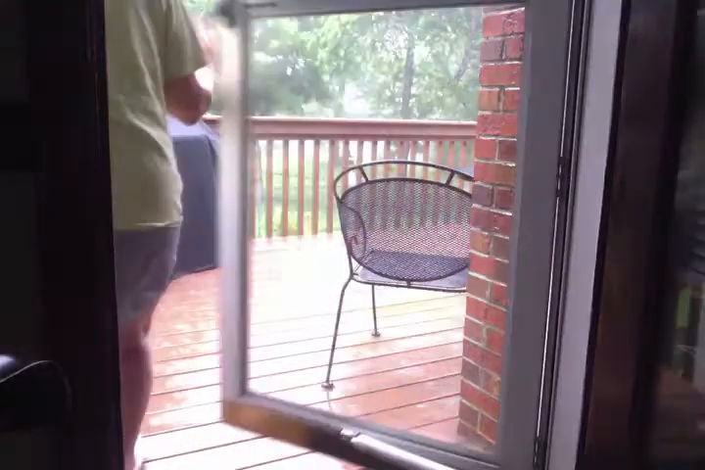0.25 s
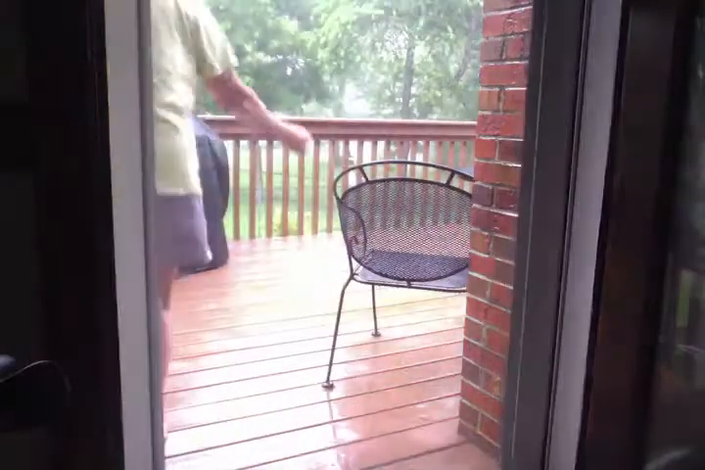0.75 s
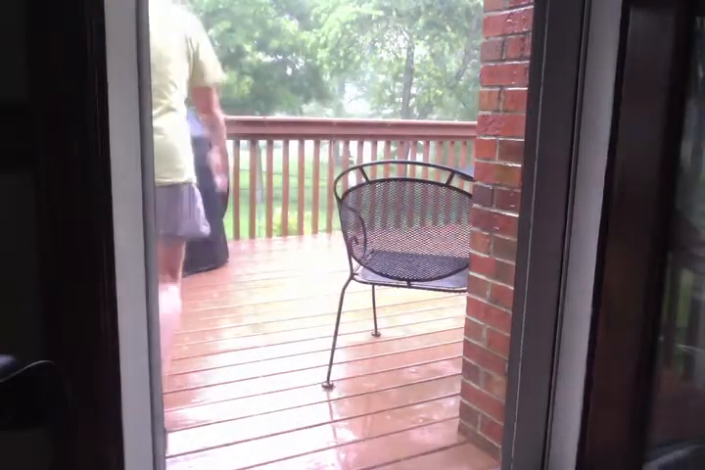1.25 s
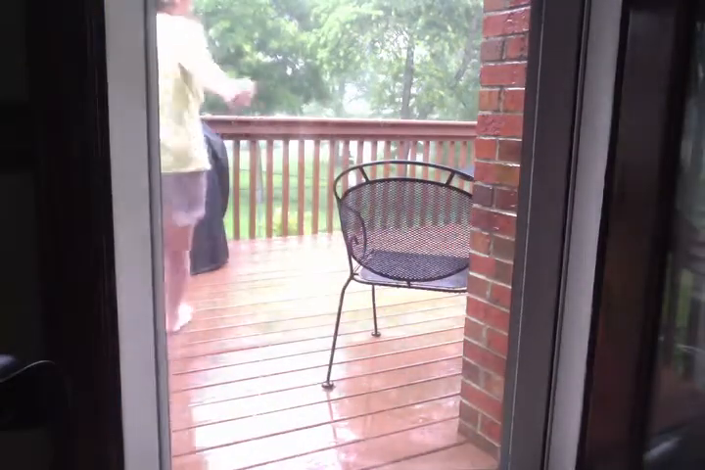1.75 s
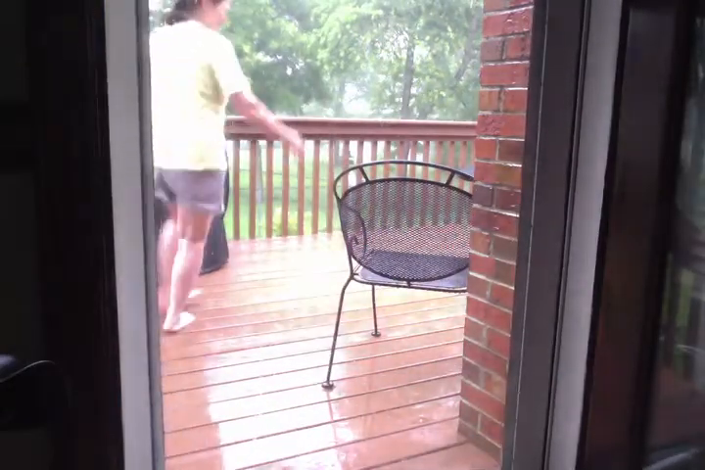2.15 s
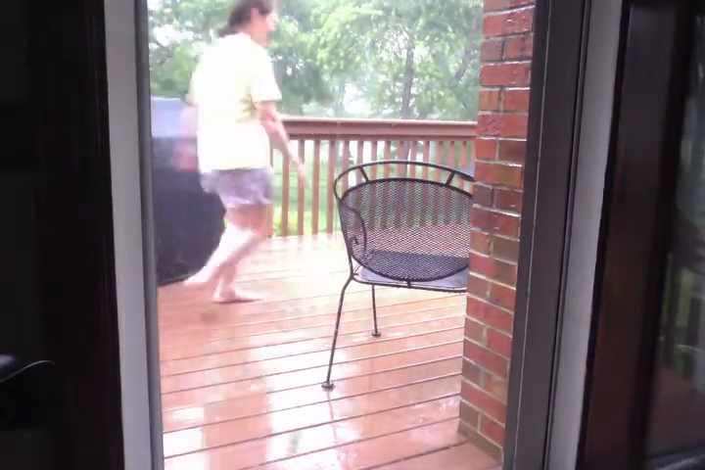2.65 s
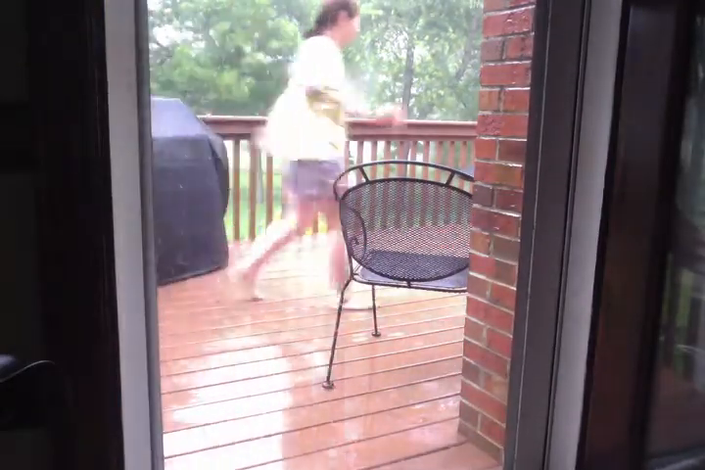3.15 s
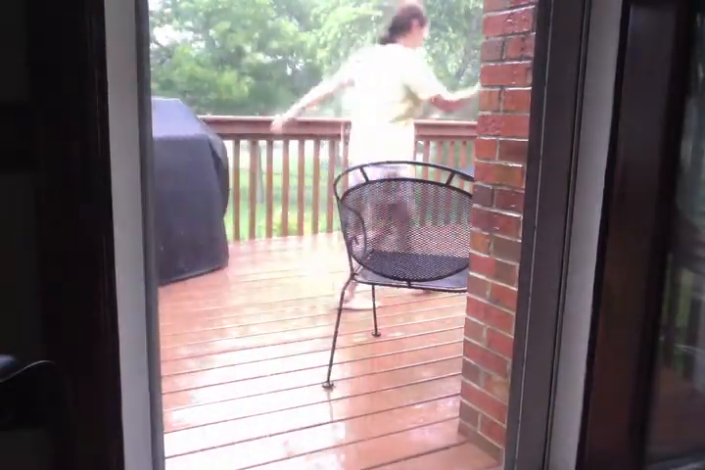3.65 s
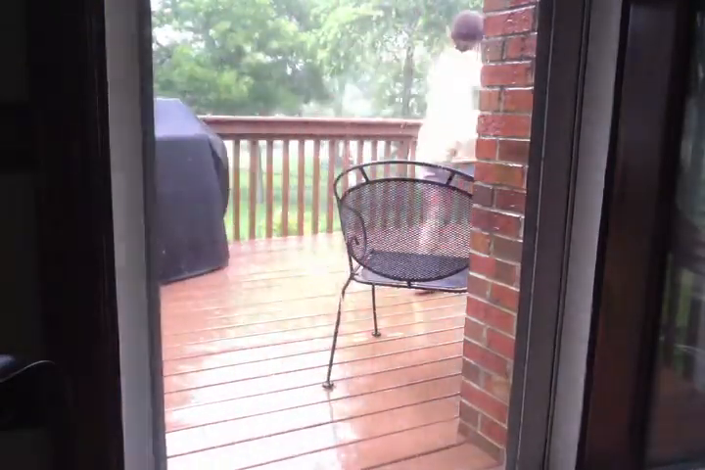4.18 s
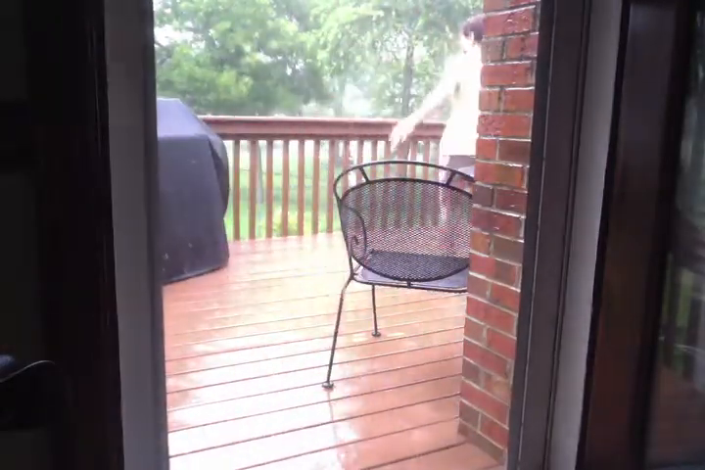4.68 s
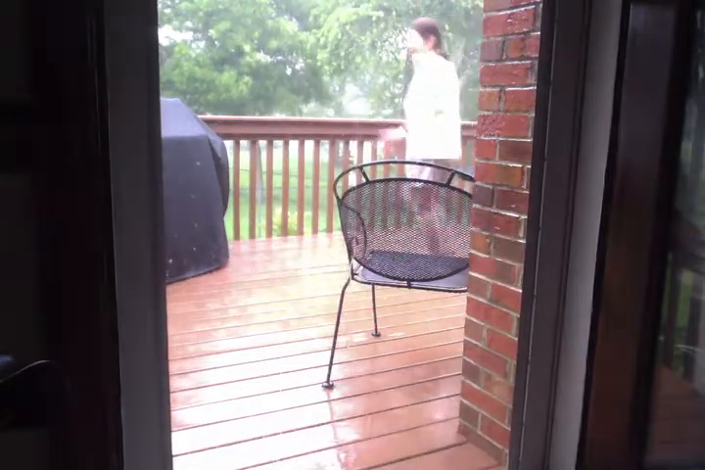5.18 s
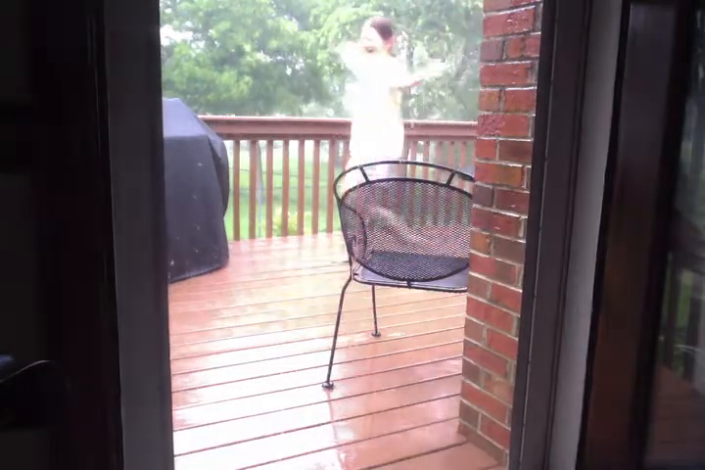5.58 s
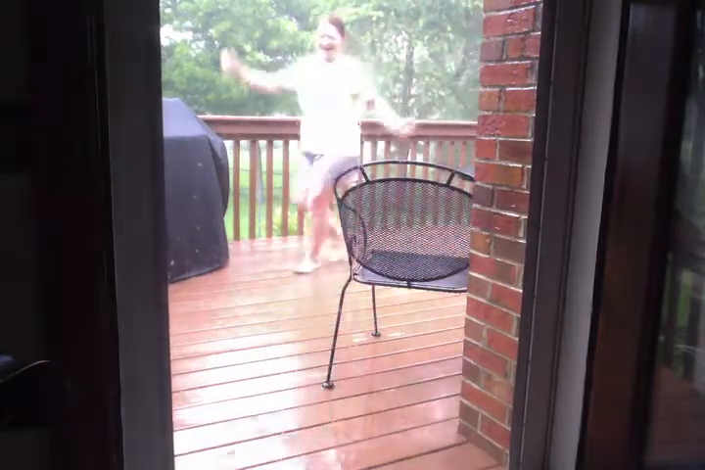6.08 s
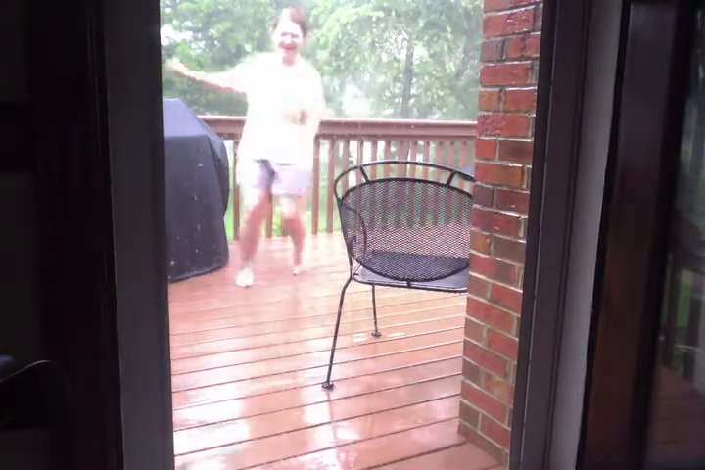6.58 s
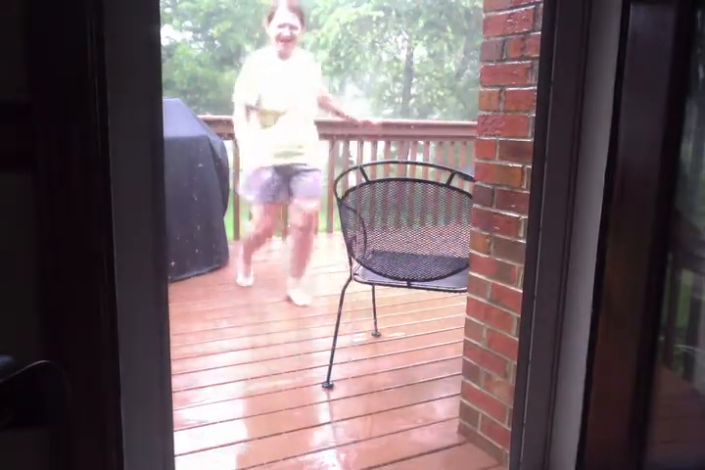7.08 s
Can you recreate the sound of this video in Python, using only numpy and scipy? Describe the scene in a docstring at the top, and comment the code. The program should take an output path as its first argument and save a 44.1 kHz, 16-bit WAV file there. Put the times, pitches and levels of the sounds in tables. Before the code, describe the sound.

Heavy rain washes and patters on a wooden deck throughout, heard from just inside a doorway. At the start a light storm door is pushed open with a loud clatter, a brushing rustle and several rattling knocks until 0.7 seconds. Its hinge gives a short, high squeal around 0.5 seconds. The closer hisses briefly at 1 second, and the door knocks again at 1.2. Bare feet splash through standing water, fading away by 5 seconds. The closer's spring clicks and pings near 0.8, 1.7 and 2.6 to 3 seconds. From 3 to 5 seconds its piston creaks softly with a quickening judder as the rain grows quieter and duller. The latch strikes sharply at 5.1 seconds and drops home at 5.5. Faint metallic ticks continue over muffled rain until the end, just past 7 seconds. A faint electrical hum and a distant engine lie underneath.

```python
"""Inside a doorway, with heavy rain on the wooden deck outside. A storm door is pushed wide: its light
frame rattles and its hinge squeals. The air closer draws it slowly shut, spring ticking, valve hissing,
piston creaking, while bare feet splash away. The latch strikes twice, the door ticks as it settles
and the rain turns duller. A mains hum and a far engine lie underneath."""
import sys
import numpy as np
from scipy import signal
from scipy.fft import rfft, irfft, next_fast_len
from scipy.io import wavfile
from scipy.ndimage import uniform_filter1d, minimum_filter1d, map_coordinates

SR = 44100
rng = np.random.default_rng(int(sys.argv[2]) if len(sys.argv) > 2 else 0)


def digitize_waveform(pressure):
    """Quantize a signal to 16-bit integers and store it at the path in sys.argv[1].

    Rows of a 2-D input are taken as channels; values are limited to [-1, 1].
    """
    field = np.atleast_2d(pressure).T
    bounded = np.clip(field, -1, 1)
    quanta = np.round(bounded * 32767).astype(np.int16)
    wavfile.write(sys.argv[1], SR, quanta)


N = 323253

# Spectra of fine spray, snapping metal edges and a dry click. Each row: frequency in Hz, relative dB.
SPRAY_SPECTRUM = [(2500, -15.5), (4200, -2.5), (6000, -9.5), (7500, -10.5), (9000, -14.5), (12000, -23),
                  (16000, -30)]
EDGE_SPECTRUM = [(200, -69.5), (2000, -28.5), (4000, 7.5), (6300, -5), (8500, -10), (10500, -9.5),
                 (13000, -14.5), (16000, -18.5)]
CLICK_SPECTRUM = [(2000, -22.5), (3800, 6), (4600, -5), (5500, 0.5), (6900, -0.5), (7800, -13), (9500, -9),
                  (11000, -11.5), (13000, -18), (16000, -22.5)]


def amp(db):
    """Decibels to gain."""
    return 10 ** (np.asarray(db) / 20)


def unit(x):
    """Scale to rms 1."""
    return x / np.sqrt(np.mean(x ** 2) + 1e-20)


def along(points, hz):
    """Interpolate (Hz, value) points on a log frequency axis."""
    point_hz, values = np.transpose(points)
    return np.interp(np.log(hz + 1), np.log(point_hz + 1), values)


def curve(rows):
    """Interpolate (seconds, value) rows to one value per sample."""
    times_s, values = np.transpose(rows)
    return np.interp(np.arange(N) / SR, times_s, values)


def wobble(rate_hz):
    """Smooth random curve, rate_hz knots a second."""
    knots = rng.standard_normal(int(N * rate_hz / SR) + 4)
    return map_coordinates(knots, [np.arange(N) * rate_hz / SR])


def filtered(x, response):
    """Apply a gain given as a function of Hz."""
    size = next_fast_len(len(x) + SR // 5)
    return irfft(rfft(x, size) * response(np.fft.rfftfreq(size, 1 / SR)), size)[:len(x)]


def coloured(x, spectrum):
    """Shape x by (Hz, dB) points, at rms 1."""
    return unit(filtered(x, lambda hz: amp(along(spectrum, hz))))


def noise(spectrum, size=N):
    """Coloured noise, rms 1."""
    return coloured(rng.standard_normal(size), spectrum)


def band(centre_hz, octaves, size=N):
    """Bell-shaped noise band, rms 1."""
    bell = lambda hz: np.exp(-(np.log2((hz + 1) / centre_hz) / octaves) ** 2)
    return unit(filtered(rng.standard_normal(size), bell))


def fade(t, t60_s):
    """1 until t = 0, then down 60 dB every t60_s."""
    return np.exp(-np.log(1000) * np.maximum(t, 0) / t60_s)


def onset(t, lag_s):
    """Exponential rise to 1."""
    return 1 - np.exp(-t / lag_s)


def swell(start_s, end_s, attack_s, release_s, db):
    """Gain held from start to end, with linear ramps before and after."""
    t = np.arange(N) / SR
    return amp(db) * np.clip(1 + np.minimum((t - start_s) / attack_s, (end_s - t) / release_s), 0, 1)


def add(track, start_s, sound):
    """Mix a sound into the track."""
    part = track[max(round(start_s * SR), 0):][:len(sound)]
    part += sound[:len(part)]


def radiated(x, corner_hz):
    """A thin panel radiates no deep bass."""
    return filtered(x, lambda hz: hz ** 3 / np.sqrt(hz ** 6 + corner_hz ** 6))


def hallway(x, wet_db):
    """Dry sound plus the hallway's reverberation."""
    # Each row: frequency in Hz, T60 in seconds.
    decay = [(200, 0.4), (600, 0.35105), (1200, 0.26683), (2200, 0.20362), (4200, 0.26733), (7000, .2),
             (14000, 0.19983)]
    hz, t, bins = signal.stft(rng.standard_normal(SR // 2), SR, nperseg=256)
    tail = signal.istft(bins * fade(t, along(decay, hz)[:, None]), SR, nperseg=256)[1]
    return x + amp(wet_db) * signal.fftconvolve(x, tail / np.linalg.norm(tail))[:len(x)]


def drops(per_s, spread_db, centre_hz, decay_cycles, count=6500):
    """Each drop is a short damped ring of its own pitch and size."""
    t = np.arange(256) / SR
    gap, pitch, size = rng.random((count, 3)).T
    starts = np.cumsum(-np.log(1 - gap)) * SR / per_s
    hz = centre_hz * 2 ** (4 * (pitch[:, None] - .5))
    strength = amp(spread_db * np.minimum(-np.log(1 - size), 5))[:, None]
    rings = strength * np.sin(2 * np.pi * hz * t) * np.exp(-hz * t / decay_cycles)
    samples = np.minimum(starts.astype(int)[:, None] + np.arange(len(t)), N)
    return unit(np.bincount(samples.ravel(), rings.ravel(), N + 1)[:N])


def rain(open_db=-44, spray_db_per_db=1.6155):
    """Far drops merge into a wash, near ones patter on the boards. The door shuts out the spray first."""
    # Rain through the narrowing gap. Each row: time in seconds, relative level in dB.
    levels = [(0, -38.5), (1.2, -43.5), (1.42, -41), (1.85, -41), (2.4, -44), (3.25, -45), (3.75, -47),
              (4.55, -48.5), (4.95, -52), (5.5, -48.5), (6.4, -52.5), (7.33, -52.5)]
    # Each row: frequency in Hz, relative dB.
    wash_spectrum = [(32, -38), (55, -24.5), (75, -16.5), (97, -5), (175, -4.5), (205, -4), (231, -1.5),
                     (400, -5.5), (569, -5), (1200, -1.5), (2790, -2), (5440, -17.5), (6000, -17),
                     (7800, -27.5), (13200, -120)]
    wash_db = curve(levels)
    spray_db = -53.5 + spray_db_per_db * (wash_db - open_db)
    patter = drops(per_s=700, spread_db=3.5, centre_hz=2198.3, decay_cycles=1.9)
    patter = unit(hallway(patter, wet_db=-.5))
    wash = unit(noise(wash_spectrum) + amp(-7) * coloured(patter, wash_spectrum))
    spray = unit(noise(SPRAY_SPECTRUM) + amp(3) * coloured(patter, SPRAY_SPECTRUM))
    return amp(wash_db - 2 + .43 * wobble(15)) * wash + amp(spray_db + .4 * wobble(9)) * spray


def engine(throttle_db=3):
    """A far engine, louder speeding up than easing off, booms as it passes two room resonances."""
    # Each row: time in seconds, firing rate in Hz.
    firing = [(1.8, 52.16), (2.62, 61.4), (3.6, 72.4), (4.66, 88.32), (5.36, 95.7), (5.9, 91.12),
              (6.34, 77.17), (6.71, 69.88), (7.33, 66.31)]
    # Each row: frequency in Hz, gain in dB.
    house_response = [(51, -27.5), (54, -22.5), (63, -9.5), (67, -6.5), (70.5, -2), (75, -10), (85, -8),
                      (90, -1.5), (96, -12.5)]
    hz = curve(firing)
    throttle = np.tanh(uniform_filter1d(np.gradient(hz) * SR, size=SR // 3) / 4)
    db = -57 + throttle_db * throttle + along(house_response, hz)
    return amp(db + 1.5 * wobble(11)) * unit(np.sin(2 * np.pi * np.cumsum(hz) / SR))


def house(hum_hz=179, fade_db_per_s=.7716):
    """A fading mains hum over the low murmur of the house."""
    # Each row: frequency in Hz, relative dB.
    murmur_spectrum = [(20, -40.5), (45, -27), (65, -10), (120, -6), (250, -4.5), (500, -6), (1500, -14.5),
                       (8000, -48.5)]
    t = np.arange(N) / SR
    hum_db = -59 - fade_db_per_s * t + 1.6 * wobble(7.6)
    hum = unit(np.sin(2 * np.pi * hum_hz * t + .25 * wobble(3.6)))
    return amp(hum_db) * hum + amp(-60.5) * noise(murmur_spectrum)


def rustle():
    """Sleeve and door sweep brush as the pushed door rattles finely; a thin scrape as it is let go."""
    # Each row: frequency in Hz, relative dB.
    brush_spectrum = [(35, -44), (60, -17), (226, -6), (368, -2.5), (2150, 1), (2710, -3.5), (4850, -9.5),
                      (8280, -23), (9740, -19.5), (15500, -39)]
    rattle_spectrum = [(1500, -22), (4200, -6.5), (7000, 1), (9000, -16.5), (12000, -7), (16000, -12.5)]
    brush = swell(0, .63085, attack_s=.01, release_s=.0746, db=-35) * noise(brush_spectrum)
    rattle = swell(0, .37, attack_s=.01, release_s=.35, db=-49.5) * noise(rattle_spectrum)
    rattle *= amp(1.984 * wobble(90))
    scrape = swell(.6, .7788, attack_s=.1, release_s=.1324, db=-47.5) * noise(SPRAY_SPECTRUM)
    return (brush + rattle + scrape) * amp(2.7 * wobble(24.938))


def frame_bumps(rebound_s=.018, rebound_db=-6.5, rebound_edge_db=-7.5):
    """The light frame clatters and rebounds once; its panel thuds and its metal edges snap."""
    # Each row: start in seconds, level in dB, thud in dB, thud pitch in Hz, edge in dB (dB relative).
    bumps = [(0.013, -26, -7, 226.3, -12.5), (.052, -10, -16, 472.8, -30.5), (.066, -5, -36.5, 299.6, -18),
             (.071, -4.5, -30.5, 139, -14), (.089, -18.5, -12.5, 601.4, -6), (.329, -16.5, -14, 367.8, -2),
             (.368, -26.5, -8.5, 120.2, -13), (.428, -27.5, -10, 143.3, -20), (.468, -27.5, -30, 200, 0),
             (.576, -18, -16, 222.3, 1), (.602, -19, -6.5, 510, -23.5), (.648, -14.5, -13, 272.6, -7),
             (.695, -21.5, -19, 199.4, -5.5), (1.24, -14, -23.5, 334.6, -13),
             (2.632, -28.5, -25.5, 220.1, -18.5), (3.061, -34, -29.5, 199.8, -17.5),
             (5.564, -30.5, -1.5, 401.5, -25.5)]
    # Each row: frequency in Hz, relative dB.
    frame_spectrum = [(40, -59.5), (110, -28.5), (200, -12.5), (400, -10.5), (600, 2), (1250, 0.5),
                      (2200, 4), (3000, -4.5), (5000, -16), (7000, -13), (10000, -41.5)]
    out, t = np.zeros(N), np.arange(SR // 6) / SR
    rebounds = [(start_s + rebound_s, db + rebound_db, thud_db, thud_hz, edge_db + rebound_edge_db)
                for start_s, db, thud_db, thud_hz, edge_db in bumps]
    for start_s, db, thud_db, thud_hz, edge_db in bumps + rebounds:
        clatter = noise(frame_spectrum, len(t)) * fade(t, t60_s=.08463)
        thud = amp(thud_db + 3.5) * band(thud_hz, octaves=.47, size=len(t)) * fade(t, t60_s=.13672)
        edge = amp(edge_db + 9) * noise(EDGE_SPECTRUM, len(t)) * fade(t, t60_s=.037806)
        add(out, start_s, amp(db - 8) * (clatter + thud + edge) * onset(t, lag_s=.0004649))
    return hallway(radiated(out, corner_hz=100), wet_db=-7)


def splashes(spatter_hz=6000, mean_flight_s=.045):
    """Feet slap standing water, leaving bubbles that rise in pitch; thrown water lands again."""
    # Each row: start in seconds, relative level in dB, pitch in Hz.
    slaps = [(.212, -22.5, 3667), (.742, -24.5, 1197), (1.196, -28.5, 3430), (1.382, -30, 3113),
             (1.43, -24, 2643), (1.672, -25, 2692), (1.5, -30, 3865), (1.871, -31.5, 1295),
             (1.898, -27.5, 2865), (2.252, -28.5, 1862), (2.27, -39.5, 11030), (2.28, -32, 3301),
             (2.492, -32.5, 3448), (3.62, -49.5, 13250), (3.635, -34.5, 1835), (3.781, -32.5, 2420),
             (4.49, -53.5, 13380), (4.886, -36.5, 1800)]
    out, t = np.zeros(N), np.arange(SR // 6) / SR
    decay = fade(t, t60_s=.066)
    landings = [(start_s + mean_flight_s * (.5 + late), db - 4.5, hz * (.5 + .7 * pitch))
                for (start_s, db, hz), (late, pitch) in zip(slaps, rng.random((len(slaps), 2)))
                if hz < spatter_hz]
    for start_s, db, hz in slaps + landings:
        octaves = .651 * min(1, 3300 / hz)  # fine spatter is a narrow fizz
        slap = band(hz, octaves, len(t)) * decay * onset(t, lag_s=.0011)
        add(out, start_s, amp(db - 7) * slap)
        for delay, pitch, weakness in rng.random((4, 3)):
            if hz < spatter_hz:
                turns = hz * (1 + .3 * (pitch - .5)) * (t + 3 * t * t)
                bubble = np.sin(2 * np.pi * turns) * decay * onset(t, lag_s=.000579)
                add(out, start_s + .028 * delay, amp(db - 7.5 - 12 * weakness) * bubble)
    return hallway(out, wet_db=-15)


def hinge_squeal(rise_share=.4771, fall_share=.11):
    """Each squeak of the hinge swells, bends in pitch toward its end and leaves the steel ringing."""
    # Each row: start and length in seconds, pitch and sag in Hz, level in dB, roughness, ring in dB.
    squeaks = [(0.439, .076, 5439, 213.5, -18, .07, -31.5), (0.508, 0.00946, 4998, 151, -23, .4, -23),
               (0.521, .016, 4715, 130, -27, .4, -25), (0.5359, 0.010927, 4317, 174.5, -8.5, 0.31, -33.5),
               (0.568, 0.020495, 3135, -190, -18.5, 1.06, -12.5)]
    out, t = np.zeros(N), np.arange(SR // 4) / SR
    for start_s, length_s, hz, sag_hz, db, rough, ring_db in squeaks:
        progress = np.minimum(t / length_s, 1)
        ramp = np.minimum(progress / rise_share, (1 - progress) / fall_share)
        grip = np.sin(np.pi / 2 * np.minimum(ramp, 1)) ** 2
        jitter = .05177 * rough * grip * wobble(700)[:len(t)]
        pitch_hz = (hz - sag_hz * progress ** 2) * (1 + jitter)
        phase = 2 * np.pi * np.cumsum(pitch_hz) / SR
        overtones = amp(-20.5 + 5.4 * rough) * np.sin(2 * phase) + amp(-37.5) * np.sin(3 * phase)
        flutter = amp(3.2 * rough * wobble(446.9)[:len(t)])
        squeak = unit(np.sin(phase) + overtones) * grip * flutter
        ring = amp(ring_db) * progress * fade(t - length_s, t60_s=.3621) * unit(np.sin(phase))
        add(out, start_s, amp(db) * (squeak + ring))
    return hallway(out, wet_db=-11)


def closer_spring(detune=.00839):
    """The closer's spring slips as it takes up the door: a dry click and a ping of steel each time."""
    # Each row: start in seconds, relative level in dB.
    slips = [(0.7809, -22.5), (1.6979, -26), (2.577, -37.5), (2.634, -26.5), (2.647, -34), (2.704, -31),
             (2.9699, -30)]
    # Each row: frequency in Hz, relative level in dB, T60 in seconds.
    steel_modes = [(3623.7, -8.5, 0.0685), (5922.9, 1.5, 0.02162), (6158.7, 3, 0.02709),
                   (6795.5, -3.5, 0.03284), (7877.4, -6, 0.02782)]
    out, t = np.zeros(N), np.arange(SR // 10) / SR
    for start_s, db in slips:
        click = amp(-3.5) * noise(CLICK_SPECTRUM, len(t)) * fade(t, t60_s=.02564)
        ping = np.zeros(len(t))
        for hz, mode_db, t60_s in steel_modes:
            turns = hz * (1 + detune * rng.normal()) * t + rng.random()
            ping += amp(mode_db) * np.sin(2 * np.pi * turns) * fade(t, t60_s)
        add(out, start_s, amp(db - 6.5) * (click + ping) * onset(t, lag_s=.000544))
    return hallway(out, wet_db=-11)


def closer_valve():
    """Air whistles out of the closer's valve."""
    return swell(.9, 1.03, attack_s=.06, release_s=.16, db=-43) * band(6920.8, octaves=.10975)


def closer_piston(start_hz=62, rise_hz_per_s=22, judder_share=.3806):
    """The piston rubs in its resonant tube, one burst per slip, juddering ever faster."""
    # Each row: time in seconds, level in dB.
    stroke = [(2.4, -92.5), (3.1, -50.5), (3.8, -52.5), (4.2, -46.5), (4.7, -47.5), (5.1, -61)]
    # Each row: centre in Hz, half-width in Hz, relative level in dB.
    tube_modes = [(1023.5, 95.45, 1.5), (1453.3, 105.56, 2.5), (2291.2, 332.6, -3), (2618.2, 105.75, 0.5),
                  (3610, 229, -7.5), (4039.8, 667.7, -8.5), (5003.5, 152.2, -7), (5587.6, 97.5, -8),
                  (6026.5, 46.7, -8.5), (6575, 233, -16), (7447, 222.7, -19.5), (10331, 1252, -30.5)]

    def tube(hz):
        return np.sqrt(sum(amp(db) ** 2 / (1 + ((hz - centre_hz) / width_hz) ** 2) ** 2
                           for centre_hz, width_hz, db in tube_modes))

    t = np.arange(N) / SR
    start_s, end_s = stroke[0][0], stroke[-1][0]
    slip_hz = (start_hz + rise_hz_per_s * (t - start_s)) * (1 + .024 * wobble(40))
    slip_phase = np.cumsum(slip_hz) / SR % 1
    judder = unit(np.exp(-slip_phase / .1322))
    rub = rng.standard_normal(N) * (1 - judder_share + judder_share * judder)
    sliding = (t > start_s) & (t < end_s)
    return amp(curve(stroke)) * unit(filtered(rub, tube)) * sliding


def closer_rod():
    """The sliding rod sings faintly and unevenly."""
    song = swell(3, 3.9, attack_s=.1, release_s=.5, db=-64) * band(6138.6, octaves=.1027)
    return song * amp(2.926 * wobble(70))


def latch(drift_turns=.012):
    """The bolt meets its plate, then drops home: each blow chatters, knocks the door and rings on."""
    # Each row: start in seconds, level in dB, chatter in seconds, then plate scrape, bolt ring,
    # crack and door body in relative dB.
    blows = [(5.142, -7.5, 0.008467, -0.5, -26.5, -18.5, -22.5),
             (5.546, -24.5, 0.0035, -1.5, 11.5, -21.5, -7), (5.549, -15, 0.008066, -9, 3.5, -3.5, 0),
             (5.689, -44.5, 0.00357, 0, 5, -8, 1.5), (5.883, -45, 0.00646, -0.5, 2.5, -2, -20.5),
             (5.916, -48.5, 0.00751, -5, 3, -29, -11)]
    # Bolt and its spring. Each row: frequency in Hz, relative level in dB, T60 in seconds.
    bolt_modes = [(978.47, -11.5, .1), (1469.6, -7, .119), (1915.7, -9, .12), (3575.9, -2.5, .17),
                  (3880.9, -0.5, .16), (3938.9, 3.5, .17), (4050.8, 0.5, .18), (4511.5, -4.5, .22),
                  (4668.3, -4.5, .28), (5361.8, -1.5, .2), (5826.8, -10, .14)]
    # Strike plate and hollow door body. Each row: frequency in Hz, relative dB.
    plate_spectrum = [(50, -65.5), (200, -49), (320, -28), (480, -13.5), (690, -3), (900, -14), (1190, -2),
                      (1450, -10), (1830, 0), (2260, 2.5), (2660, 3), (3040, -5), (3500, 1), (4200, 0.5),
                      (4900, -12), (5940, -30), (9100, -41)]
    body_spectrum = [(50, -55), (180, -29.5), (350, -12), (560, -1.5), (750, -2), (950, 0.5), (1200, -1.5),
                     (1450, 4), (2100, 0.5), (2600, 1.5), (3100, -11.5), (8000, -50.5)]
    out, t = np.zeros(N), np.arange(SR // 2) / SR
    for start_s, db, chatter_s, plate_db, bolt_db, crack_db, body_db in blows:
        contact = fade(t - chatter_s, t60_s=.0077)
        start_turns = rng.random((len(bolt_modes), 1))
        drift = drift_turns * np.cumsum(rng.standard_normal((len(bolt_modes), len(t))), axis=1)
        ring = np.zeros(len(t))
        for (hz, mode_db, t60_s), turns in zip(bolt_modes, start_turns + drift):
            envelope = contact + amp(-38.5) * fade(t, t60_s)
            ring += amp(mode_db - 7.5) * np.sin(2 * np.pi * (hz * t + turns)) * envelope
        crack = amp(crack_db + 8) * noise(EDGE_SPECTRUM, len(t)) * fade(t, t60_s=.056)
        scrape = (amp(plate_db) * noise(plate_spectrum, len(t)) + crack) * contact
        body = amp(body_db) * noise(body_spectrum, len(t))
        body *= onset(t, lag_s=.00096) * fade(t - chatter_s, t60_s=.026)
        blow = (scrape + body + amp(bolt_db) * ring) * onset(t, lag_s=.00028)
        add(out, start_s, amp(db) * hallway(blow, wet_db=-8.5))
    return radiated(out, corner_hz=250)


def settling_ticks(ping_hz=12710, ring_hz=4717.5, spread_octaves=.7):
    """The shut door settles, metal slipping on metal: a click, a ring at its own pitch, a thin ping."""
    # Each row: start in seconds, click and ping in relative dB.
    ticks = [(5.415, -40, -54), (5.514, -42.5, -70.5), (5.6585, -34.5, -52.5), (5.879, -34.5, -43),
             (5.99, -38.5, -54.5), (6.056, -39, -57.5), (6.218, -44, -54.5), (6.3248, -49, -61.5),
             (6.382, -51, -62), (6.727, -42, -51), (6.7406, -41, -46), (6.794, -50, -55.5),
             (6.865, -46.5, -54), (7.002, -48.5, -49.5), (7.0786, -53, -59.5), (7.169, -49.5, -55.5),
             (7.267, -49, -59)]
    out, t = np.zeros(N), np.arange(SR // 10) / SR
    for (start_s, click_db, ping_db), pitch in zip(ticks, rng.random(len(ticks))):
        ring = amp(-6) * band(ring_hz * 2 ** (spread_octaves * (pitch - .5)), octaves=.06, size=len(t))
        click = amp(click_db - 5.5) * (noise(CLICK_SPECTRUM, len(t)) + ring) * fade(t, t60_s=.04962)
        ping = amp(ping_db - 6.5) * band(ping_hz, octaves=.045, size=len(t)) * fade(t, t60_s=.047)
        add(out, start_s, (click + ping) * onset(t, lag_s=.0005))
    return hallway(out, wet_db=-15)


def scene():
    """Mono mix, heard from inside the doorway."""
    mix = rain() + rustle() + frame_bumps() + splashes() + closer_spring() + settling_ticks() + latch()
    mix += hinge_squeal() + closer_valve() + closer_rod() + closer_piston() + engine() + house()
    return mix[None]


def record(dry, ceiling=.98, window_s=.0012, bass_hz=50., top_hz=15900):
    """A fast limiter holds down the loudest peaks; deep bass and the highest treble are cut."""
    size = round(window_s * SR)
    gain = ceiling / np.maximum(np.abs(dry[0]), ceiling)
    limited = dry[0] * uniform_filter1d(minimum_filter1d(gain, size), size)
    highpass = lambda hz: hz ** 4 / np.sqrt(hz ** 8 + bass_hz ** 8)
    lowpass = lambda hz: np.clip((top_hz - hz) / 400 + .5, 0, 1)
    return filtered(limited, lambda hz: highpass(hz) * lowpass(hz))[None]


dry = scene()
out = record(dry)
digitize_waveform(out)
```